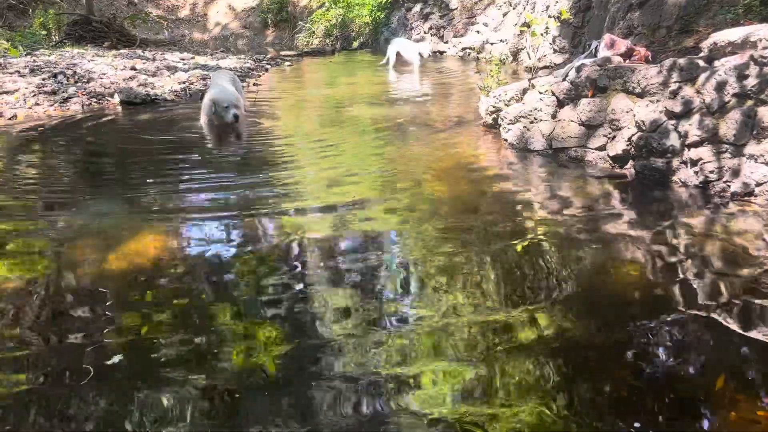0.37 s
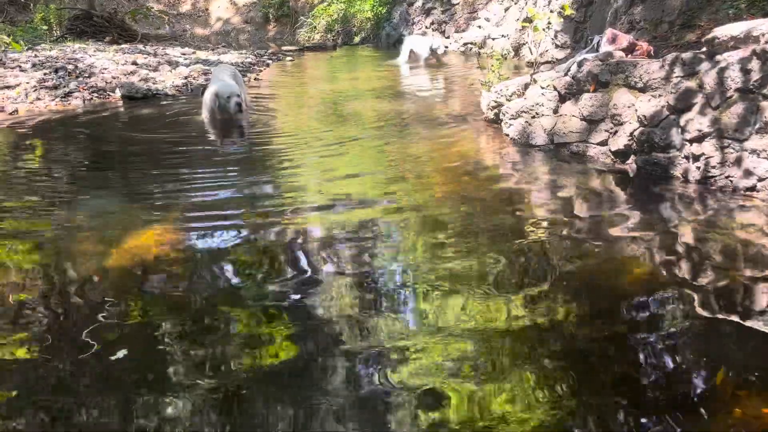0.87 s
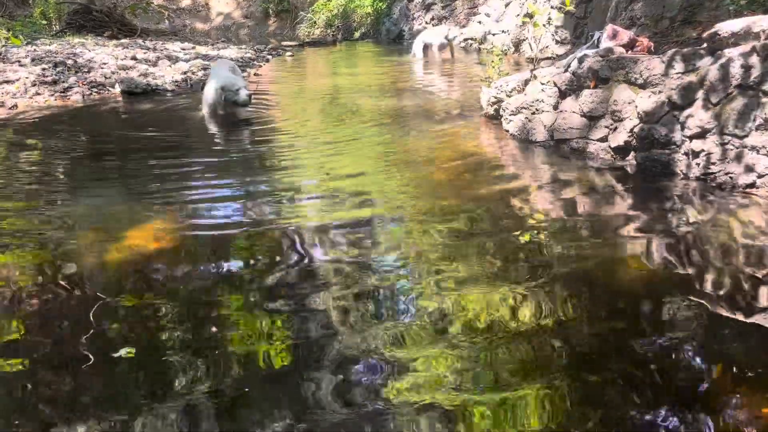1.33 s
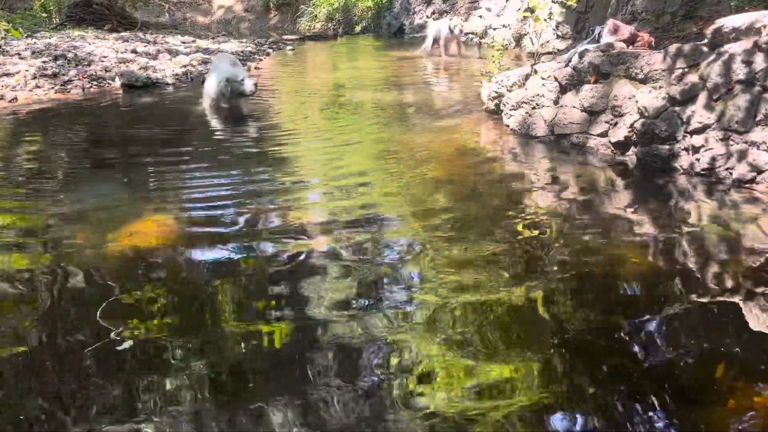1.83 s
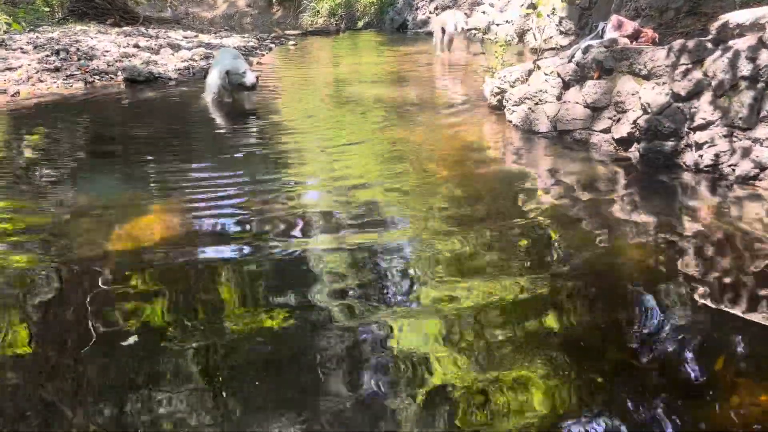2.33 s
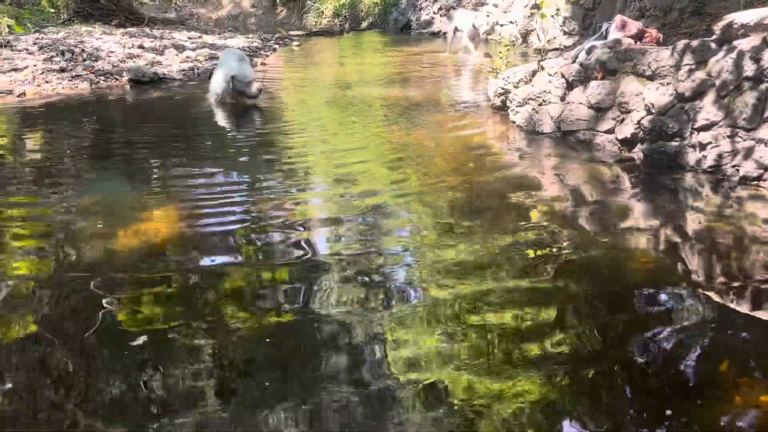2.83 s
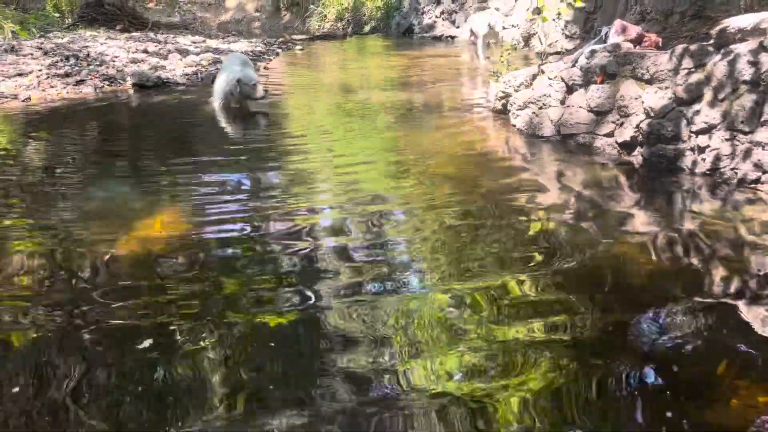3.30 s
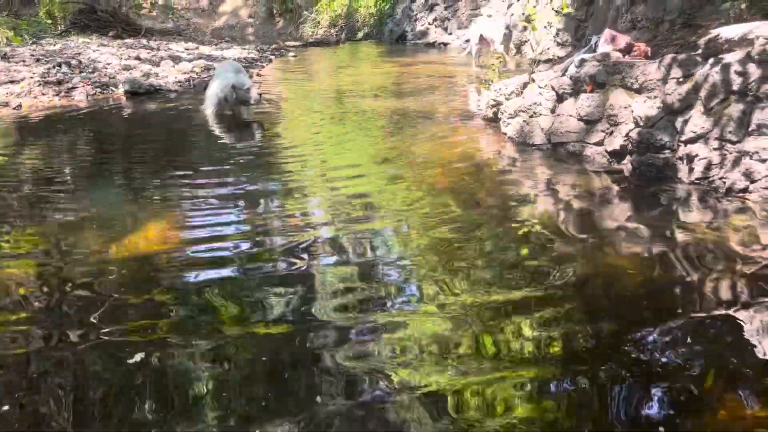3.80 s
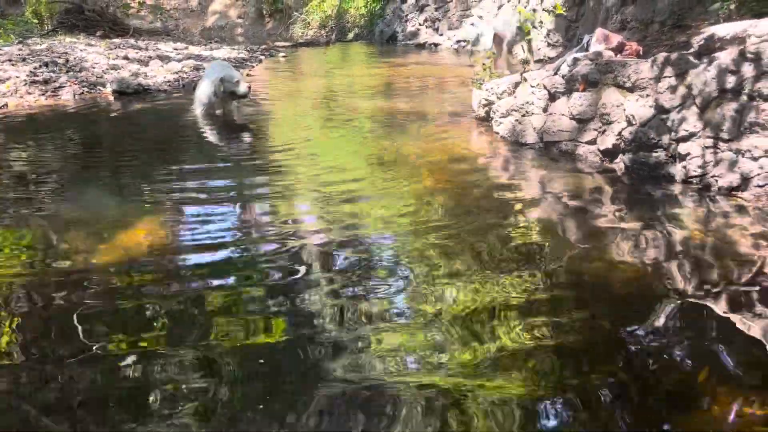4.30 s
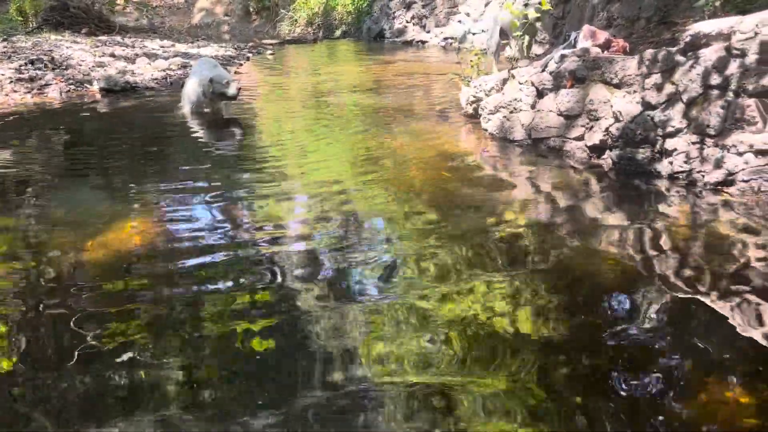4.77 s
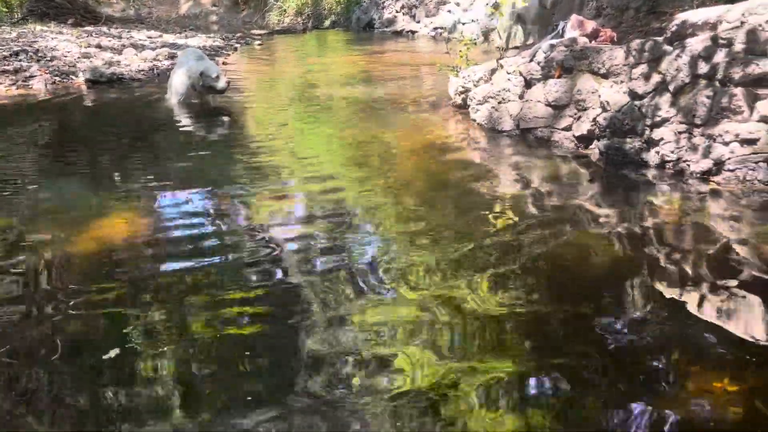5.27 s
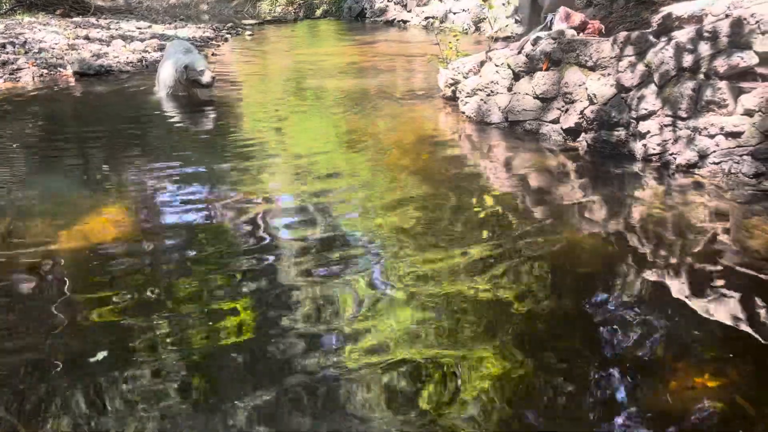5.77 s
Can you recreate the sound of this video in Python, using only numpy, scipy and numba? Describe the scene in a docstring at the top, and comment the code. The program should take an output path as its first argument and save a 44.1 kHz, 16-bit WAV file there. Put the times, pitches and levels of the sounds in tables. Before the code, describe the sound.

A shallow rocky creek heard very close on a phone-like stereo microphone outdoors. Bubbles burst, trickle and crackle continuously over a soft watery rush, while air pockets gulp in a hollow and a low wash surges. Around the middle the plops grow denser; a deep plop with a thump lands past four seconds, then louder blips close it out. No barks or voices.

```python
"""Shallow creek water sloshes and trickles close to a two-port phone while dogs wade through it.
Bursting bubbles and spray crackle over a soft rush; air pockets gulp in a hollow over a deep wash,
and the sound reaches the right port a little before the left. Noise makes rush, wash and spray;
decaying sines with gliding pitch make bubbles, plops and thumps; resonators make the hollow."""
import sys
import numpy as np
from scipy import signal
from scipy.fft import rfft, irfft
from scipy.io import wavfile
from scipy.ndimage import uniform_filter1d
from numba import njit

SR = 44100
rng = np.random.default_rng(int(sys.argv[2]) if len(sys.argv) > 2 else 0)


def attenuation_scalar(level_db):
    """Turn a level in dB into a linear amplitude multiplier (20 dB per decade)."""
    decades = np.asarray(level_db, float) / 20
    return 10 ** decades


def wav_out(sig):
    """Save sig, one row per channel (or a flat mono array), as 16-bit PCM at SR to the path in sys.argv[1]."""
    wavfile.write(sys.argv[1], SR, np.round(np.clip(np.atleast_2d(sig).T, -1, 1) * 32767).astype(np.int16))


N = 259308  # samples


def read(table):
    """Interpolate (frequency [Hz], value) rows over log frequency at every spectrum bin."""
    hz, value = np.transpose(table)
    return np.interp(np.log(np.fft.rfftfreq(N, 1 / SR) + 1), np.log(hz), value)


def colour(x, table):
    """Shape a spectrum by (frequency [Hz], gain [dB]), falling away below the table; rms 1."""
    low = np.minimum(np.fft.rfftfreq(N, 1 / SR) / table[0][0], 1) ** 2
    y = irfft(rfft(x) * attenuation_scalar(read(table)) * low, N)
    return y / np.std(y)


def walk(rate_hz):
    """Random levels held 1 / rate_hz s and slewed twice; spread near 1."""
    hold = int(SR / rate_hz)
    steps = np.repeat(rng.standard_normal(N // hold + 1), hold)
    slewed = uniform_filter1d(uniform_filter1d(steps, hold), hold)
    return 1.2 * slewed[:N]


def swells(table, rise_s, fall_s):
    """Sum of dB bumps that grow exponentially to each event and die away after it."""
    event_s, change_db = np.transpose(table)
    coarse = np.arange(0, N, 64)
    since_s = coarse[:, None] / SR - event_s
    bumps = np.exp(np.where(since_s < 0, since_s / rise_s, -since_s / fall_s)) @ change_db
    return np.interp(np.arange(N), coarse, bumps)


@njit
def ring(start, hz, cycles, size, glide, rise):
    """Each bubble swells, then decays as a sine whose pitch shifts by glide (share) per decay length."""
    out = np.zeros(N + SR)
    for g in range(len(start)):
        span = cycles[g] * SR / hz[g]  # decay length, samples
        phase = 0.
        for i in range(min(int(6 * span), SR - 1)):
            u = i / span
            phase += 2 * np.pi * min(hz[g] * (1 + glide * u), .45 * SR) / SR
            envelope = (1 - np.exp(-u / rise)) * np.exp(-u)
            out[start[g] + i] += size[g] * envelope * np.sin(phase)
    return out[:N]


def play(table, glide, rise):
    """Ring one bubble for each (time [s], level [dB], pitch [Hz], decay [cycles]) row."""
    s, db, hz, cycles = np.transpose(table)
    return ring((s * SR).astype(np.int64), hz, cycles, attenuation_scalar(db), glide, rise)


def grains(count, lo_hz, hi_hz, cycles, spread_db):
    """A random shower of bubbles, many small and few large, with an even spectrum."""
    when, pitch, big = rng.random((count, 3)).T
    hz = lo_hz * (hi_hz / lo_hz) ** pitch
    size = hz * attenuation_scalar(-spread_db * np.log(1 - .97 * big))
    start = (when * N).astype(np.int64)
    return ring(start, hz, np.full(count, 1. * cycles), size, 0.058, 0.22)


def levels_db():
    """Slosh, wash and gurgle levels: slow flow, plus wavelets, surges and gulps, plus random drift."""
    # (time [s], slosh level [dB], wash level [dB], gurgle level [dB]), before the swells
    flow = [(0.04, -46, -49.5, -54), (0.15, -45, -51.5, -53), (0.6, -42, -52, -53.5),
            (1.1, -43.5, -51.5, -50.5), (1.6, -41.5, -50.5, -56), (2.0, -42.5, -51, -49.5),
            (2.3, -41.5, -53.5, -50.5), (2.7, -42.5, -48, -51), (3.1, -42.5, -51, -54),
            (3.6, -40.5, -49.5, -51), (4.1, -41.5, -51.5, -53.5), (4.35, -40, -50.5, -52),
            (4.56, -39.5, -46.5, -53.5), (4.75, -41, -49.5, -47), (5.1, -40, -51.5, -47),
            (5.45, -42.5, -42, -50), (5.88, -43.5, -44, -49.5)]
    # wavelets that lift the slosh: (time [s], change [dB])
    wavelets = [(0.101, 5.5), (0.221, 5), (0.298, -2), (0.401, 4.5), (0.505, 1), (0.555, 5), (0.676, 5),
                (0.859, 6.5), (0.904, 5), (1.089, 4), (1.331, 4), (1.477, 3.0), (1.637, 4.5), (1.766, -1),
                (1.885, 6), (1.972, 5), (2.159, 7), (2.251, 4), (2.297, 6.5), (2.363, 3.5), (2.605, 0),
                (2.85, 3), (3.016, 2), (3.096, 6.5), (3.204, -1), (3.318, 5), (3.396, 5), (3.683, 5),
                (3.776, 2), (3.905, 3.5), (4.05, -1), (4.133, 1), (4.291, 3), (4.437, 2), (4.555, 7.5),
                (4.836, 4), (4.903, 4), (5.247, 6.5), (5.525, 4.5), (5.604, 2.5), (5.773, 7.5)]
    # surges of the deep wash: (time [s], change [dB])
    surges = [(0.107, 7), (0.283, 7), (0.532, 18), (0.927, -2), (1.115, 13), (1.287, 5), (1.539, 6.5),
              (1.598, 2), (1.851, 10.5), (1.921, 8), (2.175, 8), (2.392, 14), (2.533, 5), (2.633, 6),
              (2.704, 1), (2.994, 9), (3.059, 9), (3.128, 10), (3.269, 5.5), (3.505, 11), (3.765, 8.5),
              (3.931, 4), (4.072, 6), (4.179, 10), (4.266, 11), (4.358, 11), (4.85, 8), (5.23, 13),
              (5.386, 9.5), (5.47, 6), (5.538, 5)]
    # large air pockets that gulp in the hollow: (time [s], change [dB])
    gulps = [(0.232, 1), (0.321, 12), (0.375, 7), (0.594, 3), (0.708, 6), (0.76, 5), (0.94, 1),
             (1.124, 11.5), (1.202, 8), (1.25, 13), (1.397, 10), (1.548, 14), (1.67, 2), (1.787, 10),
             (1.924, 4), (1.982, -4), (2.184, 6.5), (2.25, 8), (2.378, 2), (2.424, 1.5), (2.505, 4.5),
             (2.809, 6), (2.887, 6), (2.994, 13), (3.119, 8.5), (3.263, 12), (3.396, 6), (3.453, 6),
             (3.57, 7), (3.732, 8), (3.828, 7), (3.945, 9), (4.046, 8), (4.199, 11), (4.3, 6), (4.484, 8),
             (4.542, 11), (4.69, 8), (4.78, -6), (4.871, 2.5), (5.138, 10.5), (5.368, 6.5), (5.554, 7.5),
             (5.604, 2), (5.777, 2)]
    s, *columns = np.transpose(flow)
    slosh_db, wash_db, gurgle_db = (np.interp(np.arange(N) / SR, s, c) for c in columns)
    slosh_db = slosh_db + swells(wavelets, rise_s=0.0042, fall_s=0.0078) + 0.5 * walk(18)
    wash_db = wash_db + swells(surges, rise_s=0.018, fall_s=0.013) + 0.56 * walk(15)
    gurgle_db = gurgle_db + swells(gulps, rise_s=0.014, fall_s=0.019) + 0.34 * walk(16)
    return slosh_db, wash_db, gurgle_db


def wash():
    """Deep wash of moving water: wavering low noise; rms 1."""
    # (frequency [Hz], relative density [dB per Hz])
    wash_colour = [(20, -12), (40, 3.5), (55, 12), (68, 13.5), (82, 13), (100, 6.5), (128, 5), (165, -2),
                   (220, -36)]
    return colour(rng.standard_normal(N) * attenuation_scalar(0.44 * walk(15)), wash_colour)


def gurgle():
    """Large air pockets ring the resonances of a hollow among the rocks; rms 1."""
    # (resonance [Hz], width [Hz], gain [dB])
    modes = [(130, 12, -5), (218, 22, 2), (370, 40, -1), (440, 200, -16.5), (549, 28, -7.5)]
    pockets = grains(count=1800, lo_hz=97.3, hi_hz=700, cycles=0.61, spread_db=2.5)
    hollow = 0
    for hz, width_hz, db in modes:
        hollow = hollow + attenuation_scalar(db) * signal.lfilter(*signal.iirpeak(hz, hz / width_hz, SR), pockets)
    return hollow / hollow.std()


def thumps():
    """Short low blows that sag in pitch, likely paws on the bed, and one deep plop that slides down."""
    # thumps: (time [s], level [dB], start pitch [Hz], decay [cycles])
    blows = [(0.518, -30, 130, 1), (2.9675, -44, 110, 0.87), (2.979, -33, 180, 0.52), (4.302, -30, 230, 1),
             (5.221, -25.5, 105.4, 0.62), (5.376, -30, 105, 0.46)]
    # deep plop, one row: (time [s], level [dB], start pitch [Hz], decay [cycles])
    plop = (4.298, -7.5, 720, 1.15)
    return play(blows, glide=-0.11, rise=0.12) + play([plop], glide=-0.14, rise=0.7)


def slosh():
    """Fizz, trickle and crackle of bubbles over a noise rush, all fluctuating together; rms 1."""
    # (frequency [Hz], relative density [dB per Hz])
    water_colour = [(300, -1.5), (560, -5.5), (900, 3), (1350, 0.9), (1650, 0.5), (1780, -1.5),
                    (2200, -0.93), (3400, -3), (4300, -8), (5100, -11.5), (5900, -9), (7900, -4.5),
                    (9200, -10), (13000, -10.5), (15500, -18.5)]
    trickle = grains(count=6500, lo_hz=400, hi_hz=5940, cycles=5.5, spread_db=2.0)
    fizz = grains(count=20000, lo_hz=259.0, hi_hz=9280, cycles=1.2, spread_db=3.2)
    crackle = grains(count=9000, lo_hz=3040, hi_hz=17500, cycles=0.31, spread_db=4.0)
    mix = attenuation_scalar(-5.5) * rng.standard_normal(N)
    for layer, db in ((trickle, -4.0), (fizz, -4.0), (crackle, -5.0)):
        mix = mix + attenuation_scalar(db) * layer / layer.std()
    return colour(mix * attenuation_scalar(0.86 * walk(45) + 2.18 * walk(120)), water_colour)


def turning(x):
    """The hand turns the phone, which shades other bands: fade between the colours of three poses."""
    # early pose: (frequency [Hz], gain [dB])
    early_colour = [(400, 2), (700, 1), (1000, 0), (2400, 0.5), (3000, -2.5), (3500, 0), (4300, 2.5),
                    (4800, 3.5), (5200, -5.5), (5600, -2), (6000, 0.5)]
    # late pose: (frequency [Hz], gain [dB])
    late_colour = [(400, 6), (560, 12), (750, -15), (1000, 1), (1200, 11.5), (1480, 5.5), (1750, 10.5),
                   (1950, 2.5), (2250, -3.5), (2450, 5), (2700, 6.5), (3150, 1), (3500, 7.5), (3800, 8.5),
                   (4250, -2), (5200, 11), (6000, 2), (7500, 6.5)]
    # (time [s], pose [-1 early, 0 middle, 1 late; clipped])
    turn = [(0, -1.4), (2.8, -1.5), (3.0, 0.11), (5.2, -0.25), (5.33, 0.37), (5.55, 0.47), (5.88, 0.85)]
    pose = np.clip(np.interp(np.arange(N) / SR, *np.transpose(turn)), -1, 1)
    early, late = (irfft(rfft(x) * attenuation_scalar(read(table)), N) for table in (early_colour, late_colour))
    return (1 - abs(pose)) * x + np.maximum(-pose, 0) * early + np.maximum(pose, 0) * late


def snaps():
    """Spray drops: each a noise burst about a millisecond long; lesser drops fall at random."""
    # loudest drops: (time [s], crack level [dB], sizzle level [dB]), before the gains below
    loudest = [(0.0563, -36, -46), (0.1597, -33.5, -43), (0.2002, -37, -50), (0.2186, -41, -47),
               (0.2524, -46, -42), (0.384, -38, -49), (0.6504, -39, -43), (0.7148, -36, -46),
               (0.7916, -32, -56), (0.8476, -28, -41), (0.8582, -31, -51), (0.8954, -35, -54),
               (0.9156, -34, -51), (0.9454, -34, -43), (1.0038, -31, -53), (1.0164, -34, -52),
               (1.2314, -38, -40), (1.3567, -27.5, -49), (1.4476, -32.5, -49), (1.6023, -27.5, -55),
               (1.6496, -31, -51), (1.7446, -33, -40), (1.8034, -39, -49), (1.8818, -25.5, -53),
               (1.916, -30, -51), (2.0233, -29, -46), (2.1261, -28, -41), (2.1577, -28, -50),
               (2.4094, -33, -51), (2.4877, -31, -39), (2.7337, -39, -55), (2.8469, -35, -54),
               (2.9094, -40, -41), (3.203, -31, -38), (3.3174, -31, -49), (3.4534, -34, -43),
               (3.6466, -31, -52), (3.7753, -40, -45), (3.9853, -30.5, -44), (4.0478, -27, -50),
               (4.0741, -31, -51), (4.1814, -34, -43), (4.355, -29, -35.5), (4.5012, -32.5, -56),
               (4.6793, -33, -50), (4.8315, -32, -42), (4.8914, -31, -40), (4.9974, -37, -41),
               (5.131, -39, -41), (5.1588, -42, -44), (5.1786, -40, -52), (5.2454, -35, -44),
               (5.2804, -39, -41), (5.4444, -37, -51), (5.5679, -26, -39), (5.6012, -33.5, -42),
               (5.623, -34, -43), (5.7577, -33, -47), (5.785, -31, -39)]
    # crack: (frequency [Hz], relative density [dB per Hz])
    crack_colour = [(1500, -30), (2800, -2.5), (5000, -1), (7000, 2), (8500, -2.5), (10000, -40)]
    # sizzle above it: (frequency [Hz], relative density [dB per Hz])
    sizzle_colour = [(6000, -40), (8500, -1), (11000, -2), (13500, -6), (15500, -3)]
    crack_gain_db, sizzle_gain_db, decay_s = -1, 8, 0.0013
    least_db, spread_db = -43, 3  # lesser drops
    s, crack_db, sizzle_db = np.transpose(loudest)
    when, crack_size, sizzle_size = rng.random((160, 3)).T
    out = 0
    for db, size, table in ((crack_db + crack_gain_db, crack_size, crack_colour),
                            (sizzle_db + sizzle_gain_db, sizzle_size, sizzle_colour)):
        kicks = np.zeros(N)
        kicks[(when * N).astype(int)] = attenuation_scalar(least_db - spread_db * np.log(1 - .95 * size))
        kicks[(s * SR).astype(int)] = attenuation_scalar(db)
        envelope = signal.lfilter([1], [1, -np.exp(-1 / (decay_s * SR))], kicks)
        out = out + envelope * colour(rng.standard_normal(N), table)
    return out


def bubbles():
    """Bubbles and plops that stand out, singers that ring on, and a thin shower of smaller plops."""
    # standouts: (time [s], level [dB], start pitch [Hz], decay [cycles])
    standouts = [(0.194, -17, 3400, 1.2), (0.219, -19.5, 3930, 3.7), (0.2267, -15, 1340, 1.4),
                 (0.2982, -15, 1920, 1.4), (0.4965, -20.5, 3280, 4.2), (0.5082, -23, 3080, 3.2),
                 (0.583, -30, 380, 3.4), (0.632, -16.5, 880, 4.7), (0.6345, -22, 2240, 3.8),
                 (0.695, -27.5, 390, 2.5), (0.703, -30, 225, 3.1), (0.743, -28, 385, 2.5),
                 (0.752, -30.5, 225, 3.3), (0.765, -33, 405, 2.8), (0.796, -26, 390, 1.7),
                 (0.806, -35, 222, 4), (0.7677, -15, 1420, 2), (0.859, -20, 4380, 3),
                 (0.901, -29.5, 412, 3.6), (0.931, -26, 390, 2.5), (0.933, -29.5, 218, 4.7),
                 (0.982, -28, 700, 5.5), (0.954, -14, 1450, 1.2), (1.0165, -22, 3120, 2),
                 (1.322, -33, 218, 5), (1.384, -19.5, 680, 4.2), (1.387, -27.5, 365, 5),
                 (1.4846, -24, 2220, 3), (1.573, -29.5, 290, 2.5), (1.662, -28.5, 370, 4),
                 (1.975, -34, 390, 2), (1.687, -22, 4930, 3.4), (1.7645, -15, 2680, 1.2),
                 (1.802, -16.5, 4100, 2.1), (1.931, -21, 4170, 2.3), (1.961, -18.5, 3770, 3),
                 (2.157, -15, 3460, 1.9), (2.248, -21, 2300, 4.1), (2.2972, -12, 1030, 0.92),
                 (2.367, -29, 215, 2.9), (2.432, -31.5, 218, 4.5), (2.348, -22, 1060, 4.6),
                 (2.548, -31, 400, 2.8), (2.654, -29, 543, 6), (2.718, -30.5, 391, 2.5),
                 (2.496, -30, 390, 2.7), (2.3692, -17.5, 4130, 3.7), (2.407, -23, 498, 3.5),
                 (2.411, -21.5, 373, 4.5), (2.6055, -14, 2490, 1.1), (2.6386, -15.5, 1560, 3.2),
                 (2.8714, -14, 716, 0.58), (2.862, -27, 620, 2.1), (2.879, -19, 408, 3.2),
                 (2.888, -30, 220, 3.4), (2.805, -34, 365, 3.2), (2.952, -26.5, 360, 3.5),
                 (2.99, -23.5, 215, 2.6), (2.936, -19, 1270, 3.8), (2.888, -21, 3700, 5),
                 (2.936, -20, 1800, 3), (2.955, -23, 2400, 5), (3.014, -16.5, 2050, 3),
                 (3.025, -22, 2050, 4), (3.057, -21, 1800, 5), (3.092, -22, 2600, 4), (3.093, -23, 1980, 5),
                 (3.223, -20, 2250, 4), (3.257, -20, 3100, 4), (3.048, -17, 1230, 2.1),
                 (3.202, -15.5, 2510, 3.9), (3.384, -22, 903, 4.7), (3.557, -24.5, 560, 3.9),
                 (3.6812, -11.5, 1900, 1.9), (3.7758, -12.5, 2880, 1.3), (3.8, -17, 4480, 2.1),
                 (3.8105, -12, 1560, 2.3), (3.9044, -17.5, 3120, 1.3), (4.022, -19, 1190, 2.1),
                 (4.1315, -11.5, 1800, 1.4), (4.2907, -9, 2360, 0.82), (4.323, -19, 920, 2),
                 (4.324, -20, 2150, 4), (4.478, -22, 1750, 4), (4.502, -21, 1900, 4), (4.516, -23, 2450, 4),
                 (4.577, -19, 2400, 3), (4.428, -16, 2190, 1.8), (4.4357, -15.5, 2130, 2.6),
                 (4.5503, -25, 665, 2.5), (4.553, -14, 1850, 2.1), (4.663, -26, 360, 3.6),
                 (4.68, -24, 224, 1.9), (4.697, -26.5, 408, 5.5), (4.703, -31, 235, 3.6),
                 (4.748, -24.5, 238, 2), (4.76, -21.5, 927, 6.5), (4.862, -28, 223, 2.2),
                 (4.772, -24, 350, 2.3), (4.8315, -19, 2320, 3.2), (4.8667, -15.5, 1210, 1.3),
                 (4.903, -21, 1900, 2.3), (5.1795, -17, 4830, 3.7), (5.2735, -17, 3250, 2.9),
                 (5.2882, -18, 2300, 2.1), (5.3624, -12, 1110, 1.3), (5.498, -7, 1430, 1.3),
                 (5.46, -19, 1200, 5), (5.567, -16, 2900, 1), (5.601, -17, 2700, 1.2),
                 (5.603, -13, 1650, 2), (5.62, -21, 1700, 4), (5.838, -21, 1750, 4),
                 (5.712, -18.5, 1100, 3.9), (5.77, -10, 1340, 2.2), (5.7842, -19, 1170, 7.1),
                 (5.8635, -10.5, 1450, 1.9)]
    # singers, climbing a little: (time [s], level before flutter [dB], start pitch [Hz], decay [cycles])
    singers = [(0.08, -32, 1860, 18), (0.126, -30, 746, 8), (0.285, -30, 1817, 16), (0.395, -28, 1850, 18),
               (0.42, -26, 1920, 11), (0.425, -23.5, 790, 4), (0.543, -23, 1944, 9.4),
               (0.578, -30, 2190, 16), (0.962, -28.5, 2040, 20), (1.083, -26, 2020, 10),
               (1.176, -22, 700, 5.3), (1.23, -30, 2450, 12), (1.322, -26, 2060, 16),
               (1.452, -29, 1830, 15), (1.466, -27, 2070, 19), (1.48, -25, 2100, 14),
               (1.495, -28, 1890, 20), (1.515, -29.5, 2360, 26), (1.532, -28, 610, 4.5),
               (1.548, -26.5, 526, 3.2), (1.55, -21, 1365, 7.4), (1.563, -23, 1110, 9.9),
               (1.575, -25, 673, 5), (1.585, -25, 900, 6), (1.608, -29, 775, 6), (1.562, -28, 2200, 12),
               (1.625, -31, 2150, 13), (1.634, -25, 1780, 9.5), (1.955, -31, 1790, 16),
               (1.985, -31, 2050, 13), (2.055, -28, 1903, 16), (2.105, -23.5, 2090, 13),
               (2.32, -29, 2250, 11), (2.845, -31, 2160, 12), (2.987, -28, 2100, 9), (3.04, -30, 1830, 26),
               (3.085, -33, 1950, 12), (3.095, -31, 2530, 16), (3.06, -35, 2140, 18),
               (3.128, -30, 2580, 18), (3.155, -30, 2370, 20), (3.18, -29, 2230, 16), (3.21, -25, 2190, 18),
               (3.312, -17, 1540, 10), (3.375, -26.5, 1836, 24), (3.457, -28, 2000, 19),
               (3.656, -28, 2260, 14), (4.186, -27, 704, 6), (5.31, -24, 3830, 16), (5.52, -25, 2520, 12),
               (5.635, -25, 1757, 12), (5.757, -24, 3500, 14), (5.8, -25, 1780, 10),
               (5.805, -24.5, 3560, 20)]
    lesser = grains(count=300, lo_hz=358, hi_hz=4790, cycles=2.7, spread_db=1.5)
    lesser = colour(lesser, [(300, 0.0), (1000, 7.5), (2200, -0.5), (5000, -13)])
    flutter_db = 2.5 * (walk(250) - 1)  # they waver as the surface rocks
    singing = play(singers, glide=0.02, rise=0.98) * attenuation_scalar(flutter_db)
    return play(standouts, glide=0.0043, rise=0.99) + singing + attenuation_scalar(-56) * turning(lesser)


def rocks(x):
    """The rocky bank scatters splashes into short dull tails, mixed by drifting splash spots."""
    gain_db, t60_s, lowpass_hz = -11, 0.075, 4660
    t = np.arange(int(.1 * SR)) / SR
    tails = rng.standard_normal((4, len(t))) * attenuation_scalar(-60 * t / t60_s) * np.minimum(t / 0.0021, 1)
    tails = signal.lfilter(*signal.butter(1, lowpass_hz, fs=SR), tails)
    spots = np.array([walk(2.974) for _ in tails])
    spots = spots / np.linalg.norm(spots, axis=0)
    back = 0
    for spot, tail in zip(spots, tails):
        back = back + signal.fftconvolve(x * spot, tail / np.linalg.norm(tail))[:N]
    return x + attenuation_scalar(gain_db) * back


def ports(x):
    """The phone body delays and shades one port against the other; in some poses one band lags more."""
    # (frequency [Hz], lag of left port [rad])
    port_lag = [(200, 0.25), (430, 0.89), (700, 1.9), (1000, 2.55), (1600, 2.65), (1900, 6.16),
                (2400, 5.46), (3900, 7.75), (4500, 4.4), (5300, 6.53), (7000, 8.02), (7800, 9.01),
                (9000, 9.7), (10900, 12.08), (12900, 12.5), (14300, 15.16)]
    # (frequency [Hz], left minus right [dB])
    port_shade = [(200, -1), (500, 2), (800, -2), (1350, -5), (1700, -1.5), (2300, -1.1), (3100, -3),
                  (3700, 5.5), (4500, 9), (5300, -2.5), (5900, 6), (6700, -0.5), (7800, 1.66)]
    # (frequency [Hz], extra lag of left port when tilted [rad])
    tilt_lag = [(450, 0), (600, 1.1), (800, 0.33), (1100, 0.15)]
    # (time [s], tilted share [0-1])
    tilt_share = [(0, 0.3), (2.9, 0.089), (3.05, 0.46), (4.0, 0.9), (4.2, 0.17), (5.2, 0.72), (5.35, 0.89),
                  (5.88, 0.49)]
    tilt = np.clip(np.interp(np.arange(N) / SR, *np.transpose(tilt_share)), 0, 1)
    lag_rad = read(port_lag)
    out = 0
    for share, lag in ((1 - tilt, lag_rad), (tilt, lag_rad + read(tilt_lag))):
        half = attenuation_scalar(read(port_shade) / 2) * np.exp(-.5j * lag)  # left; right is its inverse
        out = out + share * irfft(rfft(x) * np.array([half, 1 / half]), N)
    return out


def scene():
    """Near water through both ports, plus unrelated water from all around."""
    # water from all around: (frequency [Hz], gain [dB])
    diffuse = [(60, -6), (280, -4.5), (600, -13.5), (1100, -9.5), (1700, -2.5), (2500, -1.5), (4400, -5.5),
               (5500, 1), (6500, -11), (8300, -50), (10000, -18), (11800, -11), (13700, -20)]
    slosh_db, wash_db, gurgle_db = levels_db()
    # independent copies: near, around left, around right
    splash = [turning(attenuation_scalar(slosh_db) * slosh()) for _ in range(3)]
    deep = [attenuation_scalar(wash_db) * wash() + attenuation_scalar(gurgle_db) * gurgle() for _ in range(3)]
    near = rocks(splash[0] + bubbles() + snaps()) + deep[0] + thumps()
    around = irfft(rfft(np.add(splash[1:], deep[1:])) * attenuation_scalar(read(diffuse)), N)
    return ports(near) + around


def roll_off(x):
    """The treble ends steeply here."""
    return signal.sosfilt(signal.butter(12, 15730, fs=SR, output="sos"), x)


def record(dry):
    """Sound begins after a short silence; a steep low-pass cuts the top."""
    start_s, top_hz = 0.035, 15750
    gated = dry * (np.arange(N) > start_s * SR)
    lowpass = signal.ellip(8, .2, 70, top_hz, fs=SR, output="sos")
    mix = signal.sosfilt(lowpass, gated)
    return roll_off(mix)


dry = scene()
out = record(dry)
wav_out(out)
```